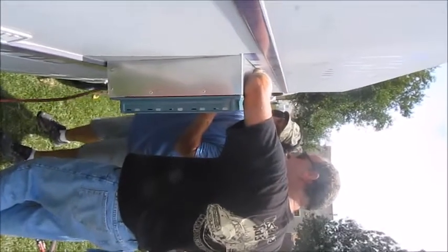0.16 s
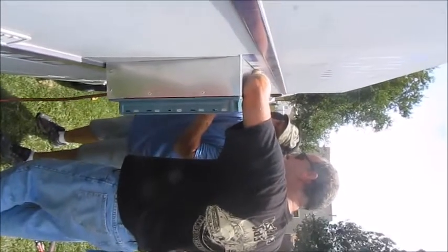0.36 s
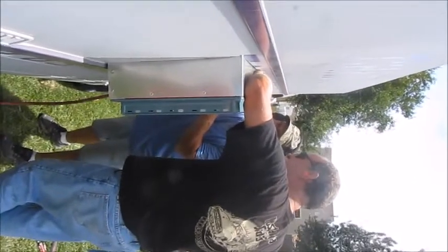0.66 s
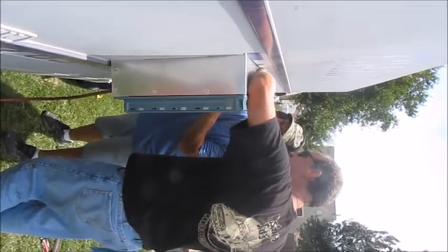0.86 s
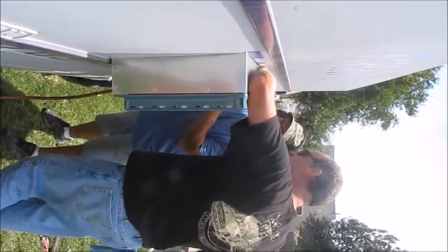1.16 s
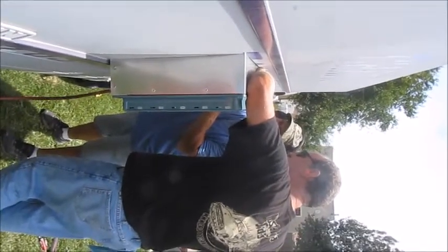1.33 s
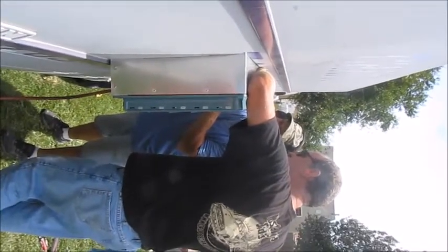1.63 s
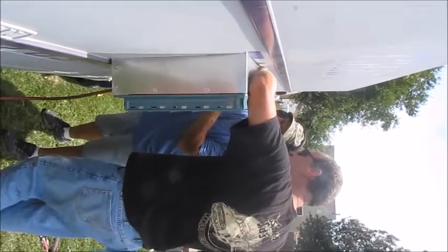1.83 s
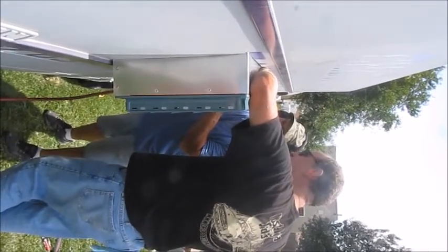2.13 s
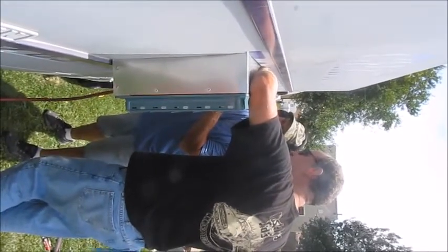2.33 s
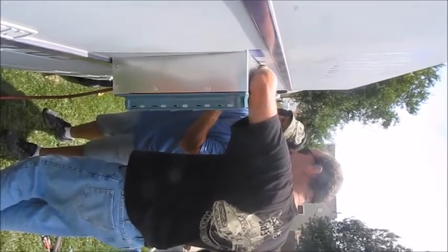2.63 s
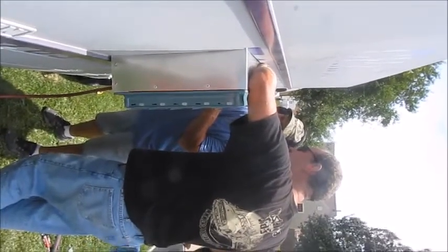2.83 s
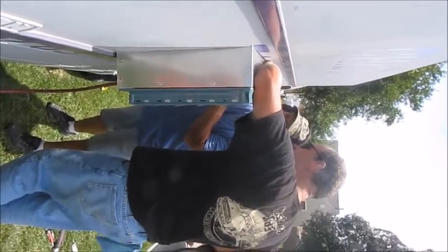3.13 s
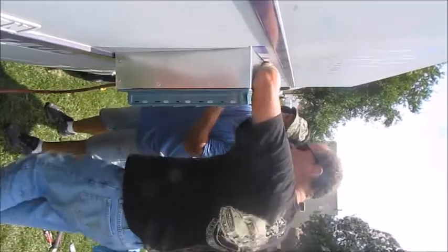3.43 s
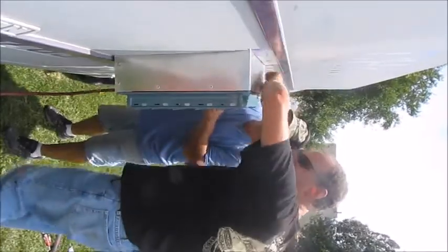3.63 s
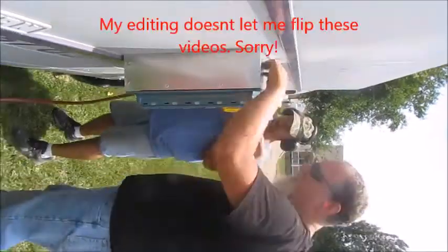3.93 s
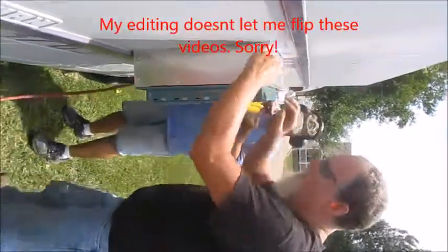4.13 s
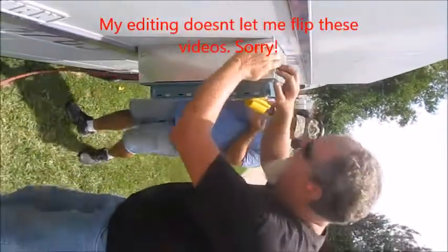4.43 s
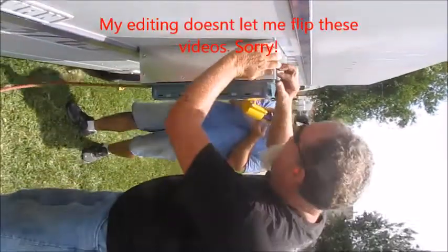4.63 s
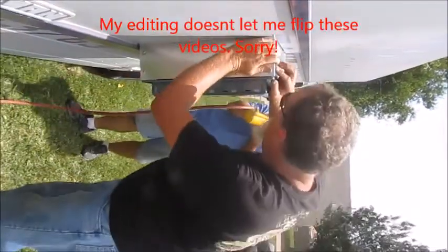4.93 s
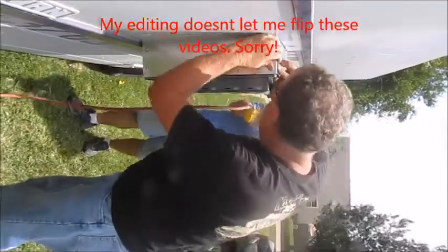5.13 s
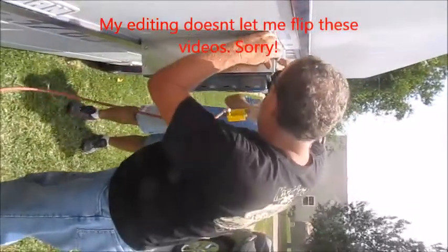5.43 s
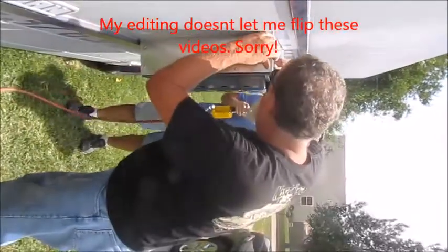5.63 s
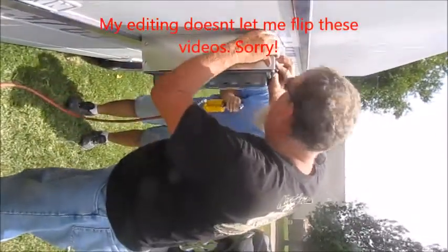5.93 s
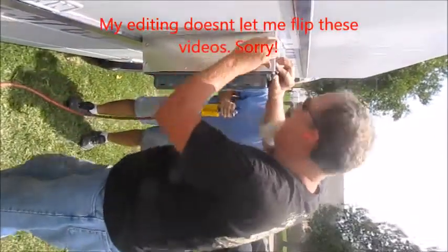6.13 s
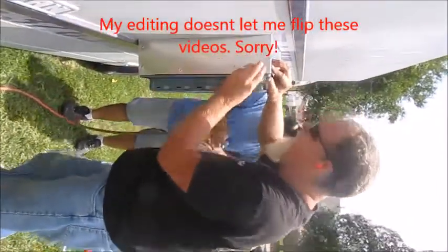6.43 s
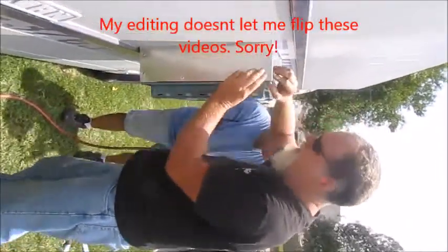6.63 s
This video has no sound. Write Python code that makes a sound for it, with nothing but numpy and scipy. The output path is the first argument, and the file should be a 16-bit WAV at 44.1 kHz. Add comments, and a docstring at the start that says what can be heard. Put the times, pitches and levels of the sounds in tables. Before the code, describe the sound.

An air-powered riveter jolts a metal panel, hisses, then snaps sharply and hisses again, over soft outdoor wash and low drone, ending in handling bumps.

```python
"""Pneumatic rivet gun on a trailer wall

Outdoors, a rivet gun pulls a rivet into sheet metal in two strokes: air rushes in and the panel jolts.
On the second the mandrel snaps. After each, a fading hiss vents the cylinder until the piston clacks home.
Fingers knock and rub the camera case (filtered pushes); a wash, a droning machine and a breeze lie behind.
Automatic gain control turns everything down when the middle range gets loud, then lets it creep back."""
import sys
import numpy as np
from scipy import signal
from scipy.fft import rfft, irfft, next_fast_len
from scipy.io import wavfile

SR = 44100
rng = np.random.default_rng(int(sys.argv[2]) if len(sys.argv) > 2 else 0)


def inscribe(sig):
    """Save sig as 16-bit PCM at rate SR to the path in sys.argv[1].

    A 1-D sig is mono; a 2-D sig holds one channel per row.
    Samples are clipped to [-1, 1] before scaling.
    """
    pcm = np.round(np.clip(np.atleast_2d(sig).T, -1, 1) * 32767)
    wavfile.write(sys.argv[1], SR, pcm.astype(np.int16))


N = 298865
TIME = np.arange(N) / SR  # seconds through the whole scene
AGE = TIME[:SR]  # seconds since one sound began, up to one second


def amp(db):
    """Turns decibels into gain."""
    return 10 ** (np.asarray(db) / 20)


def evened(x):
    """Scales a sound to rms 1."""
    return x / np.sqrt(np.mean(x ** 2) + 1e-20)


def read(points, hz):
    """Reads a table between its points, along a logarithmic frequency axis."""
    f, value = np.transpose(points)
    return np.interp(np.log(hz + 1), np.log(f + 1), value)


def level(points):
    """Draws the gain over time through points of seconds and dB."""
    return amp(np.interp(TIME, *np.transpose(points)))


def add(mix, s, sound):
    """Adds a sound into the mix, starting at s seconds."""
    part = mix[:, round(s * SR):][:, :sound.shape[-1]]
    part += sound[..., :part.shape[1]]


# How alike the gun's direct sound is left and right. Each row: frequency in Hz, likeness (1 is the same).
GUN_LIKENESS = [(100, 1), (3500, .99), (6000, 0.89), (8500, .87), (12000, .45), (16000, .3)]
# The gun's direction. Each row: frequency in Hz, phase in radians by which the left leads.
LEFT_LEAD = [(100, -0.43), (3000, -.05), (6000, -.15), (8500, -.25), (12000, -.6)]
# Difference in how well the two ports hear. Each row: frequency in Hz, left minus right in dB.
PORT_TILT = [(100, -0.9), (700, -0.7), (2400, -0.1), (4400, -0.4), (8500, -0.7), (13000, 2)]


def noise(spectrum, size=SR, likeness=GUN_LIKENESS, lead=1):
    """Colours noise for two microphone ports: a shared part plus a part of opposite sign in each."""
    padded = next_fast_len(size)
    hz = np.fft.rfftfreq(padded, 1 / SR)
    a, b = rfft(rng.standard_normal((2, padded)))
    same = np.clip(read(likeness, hz), -1, 1)
    mid = a * np.sqrt(1 + same)
    side = b * np.sqrt(1 - same)
    left = (mid + side) * np.exp(1j * lead * read(LEFT_LEAD, hz)) * amp(read(PORT_TILT, hz))
    ports = np.array([left, mid - side])
    return evened(irfft(ports * amp(read(spectrum, hz)), padded)[:, :size])


def waver(rate_hz, size=N):
    """Makes smooth random movement of about rms 1, mostly slower than the given rate."""
    knots = np.arange(0, size + 32, 32)  # one point every 32 samples
    hz = np.fft.rfftfreq(len(knots), knots[1] / SR)
    slow = irfft(rfft(rng.standard_normal(len(knots))) / (1 + (hz / rate_hz) ** 4), len(knots))
    return np.interp(np.arange(size), knots, evened(slow))


def ring(modes):
    """Rings struck metal as fading sine waves, scaled to about rms 1 at the start."""
    waves = 0
    for hz, db, t60 in modes:
        tone = np.sin(2 * np.pi * (hz * AGE + rng.random()))
        waves = waves + amp(db - 60 * AGE / t60) * tone
    start_rms = np.sqrt(sum(amp(db) ** 2 for _, db, _ in modes) / 2)
    return waves * np.minimum(AGE / 0.0015, 1) / start_rms


def gate(length, rise, release):
    """Opens over the rise time, holds until the length, then dies away (all in seconds)."""
    return np.minimum(AGE / rise, 1) * np.exp(-np.maximum(AGE - length, 0) / release)


def reflect(x, wet_db=-4, spread=.022, count=24):
    """Adds scattered early echoes from wall, awning and bodies, which comb the sound."""
    delay = .001 + rng.exponential(spread, count)
    taps = np.zeros(SR)
    places = np.minimum(delay * SR, SR - 1).astype(int)
    taps[places] = rng.choice([-1, 1], count) * np.exp(-delay / spread)
    taps *= amp(wet_db) / np.linalg.norm(taps)
    taps[0] = 1  # the direct sound
    return signal.fftconvolve(x, taps[None] / np.linalg.norm(taps), axes=1)[:, :N]


# Colour of the outdoor wash. Each row: frequency in Hz, level in dB per Hz.
WASH_COLOUR = [(120, -51), (200, -20.5), (298, -10.5), (512, -8), (818, -1), (1290, -4.5), (1780, -4.5),
               (2060, -6), (3230, -11), (3870, -19), (5360, -12.5), (7150, -15.5), (9550, -24),
               (11900, -34.5), (15000, -66)]
# How alike the outdoor sound is left and right. Each row: frequency in Hz, likeness (1 is the same).
OUTDOOR_LIKENESS = [(100, 0.91), (3000, 0.96), (6000, 0.79), (8500, 0.73), (12000, 0.2), (16000, 0.18)]
# Resonances of a far fan. Each row: frequency in Hz, width in Hz, level in dB relative to the wash.
FAN = [(880, 73, -15.5), (1800, 58, -18)]


def outdoor_wash():
    """Spreads wide, slightly wavering noise, with a fan's whirr as noise through narrow bands."""
    wash = noise(WASH_COLOUR, size=N, likeness=OUTDOOR_LIKENESS, lead=0) * amp(.4 * waver(10))
    for hz, width, db in FAN:
        band = signal.butter(2, [hz - width / 2, hz + width / 2], "band", fs=SR, output="sos")
        wash = wash + amp(db) * evened(signal.sosfilt(band, rng.standard_normal(N)))
    return wash


# Colour of the machine's drone. Each row: frequency in Hz, level in dB per Hz.
DRONE_COLOUR = [(30, -33.5), (55, -12), (85, -8), (130, 1), (250, -1.5), (350, 0.5), (450, -3.5),
                (600, -8.5), (900, -11.5), (1400, -29), (3000, -43.5), (15000, -100)]
# The machine's hum. Each row: centre pitch in Hz, centre level in dB relative to the bass level.
HUM_TONES = [(55, -23), (167, -22), (302, -12), (861, -23)]


def machine_drone():
    """Makes a lumpy low noise and adds hum tones that waver in pitch and level."""
    drone = noise(DRONE_COLOUR, size=N, likeness=OUTDOOR_LIKENESS, lead=0) * amp(0.88 * waver(14) - 5)
    for hz, db in HUM_TONES:
        turns = np.cumsum(hz * (1 + 0.00696 * waver(6.18))) / SR
        tone = np.sqrt(2) * np.sin(2 * np.pi * turns)
        drone = drone + amp(db + 2 * waver(8)) * tone
    return drone


# Colour of the breeze on the microphone ports. Each row: frequency in Hz, level in dB per Hz.
BREEZE_COLOUR = [(20, -14), (60, 0.5), (110, -4), (200, -15.5), (600, -45), (15000, -110)]


def light_breeze():
    """Blows uneven low noise on the ports, pushing them partly in opposite directions."""
    opposed = [(20, -0.33), (200, -.3)]
    return noise(BREEZE_COLOUR, size=N, likeness=opposed, lead=0) * amp(2.4 * waver(9))


WASH_DB, BREEZE_DB = -41.9, -22  # dB; the breeze is relative to the bass level
# Shared level of drone and breeze. Each row: time in seconds, level in dB.
BASS_LEVEL = [(0, -48.5), (.6, -41), (1.6, -32.5), (2.3, -32), (2.57, -53), (3.07, -53), (3.12, -69),
              (3.9, -69), (4.15, -53), (4.6, -42), (4.75, -56), (6.78, -59)]


def outdoors():
    """Layers the steady wash with the machine's drone and the breeze, whose level moves over time."""
    bass = machine_drone() + amp(BREEZE_DB) * light_breeze()
    return amp(WASH_DB) * outdoor_wash() + level(BASS_LEVEL) * bass


# Trigger pulls. Each row: start in seconds, length in seconds, air level in dB, swell of the air over
# the pull in dB, panel jolt in dB, starting metal scrape in dB, judder in dB relative to the jolt.
TRIGGER_PULLS = [(0.973, .079, -32.5, 4, -27.5, -44, 0), (2.773, 0.052, -30.5, -0.5, -33.5, -29, -3)]
# Cylinder venting. Each row: start in seconds, seconds until the piston is home, blast in dB, sizzle in dB,
# outflow halfway through in dB, rise in seconds, nose rattling on the panel in dB (both starting levels
# for blast and sizzle).
CYLINDER_VENTS = [(1.669, .565, -8.7, -12, -37.5, 0.0045, -16.5),
                  (4.051, 0.559, -5.5, -15.5, -31.5, 0.01, -42)]
# The mandrel breaking, one row: start in seconds, clatter and crack level in dB, clatter's time to fall
# 60 dB in seconds, panel ring in dB.
MANDREL_SNAP = (2.8318, -1, 0.1434, -14.5)
# The piston hitting its stop. Each row: start in seconds, level in dB, time to fall 60 dB in seconds.
PISTON_STOPS = [(2.232, -29, 0.074), (4.6245, -24.5, 0.072)]
# Light scuffs of the tool. Each row: start in seconds, length in seconds, level in dB.
TOOL_SCUFFS = [(3.525, 0.015, -38), (6.454, 0.046, -42)]


def gun():
    """Places the gun's air and metal sounds, each group with its own scattered echoes."""
    air, metal = np.zeros((2, 2, N))
    for s, *row in TRIGGER_PULLS:
        add(metal, s, pull(*row))
    for s, *row in CYLINDER_VENTS:
        add(air, s, vent(*row))
    add(metal, 1.93, regrip())
    for s, *row in PISTON_STOPS:
        add(metal, s, piston_stop(*row))
    add(metal, MANDREL_SNAP[0], snap(*MANDREL_SNAP[1:]))
    for s, *row in TOOL_SCUFFS:
        add(metal, s, scuff(*row))
    air_echoes = reflect(air, wet_db=-6, spread=.024, count=60)
    metal_echoes = reflect(metal, wet_db=-6, spread=.014, count=60)
    return air_echoes + metal_echoes


# Colour of the air rushing in. Each row: frequency in Hz, level in dB per Hz.
INTAKE_COLOUR = [(710, -36), (1200, -1), (1750, -15), (2260, -2.5), (2430, -10), (2860, -1), (4240, -21.5),
                 (4670, -6.5), (9080, -6), (15000, -32), (15500, -80)]
# Colour of metal rattling and scraping. Each row: frequency in Hz, level in dB per Hz.
RATTLE_COLOUR = [(40, -35), (130, -7.5), (260, -1), (370, -3.5), (480, 3.5), (680, -3), (1200, -1.5),
                 (1650, -13), (2900, -5), (3900, -20), (6000, -17), (15000, -47.5)]
# Colour of the panel's low judder. Each row: frequency in Hz, level in dB per Hz.
JUDDER_COLOUR = [(40, -32), (90, -14), (170, 2), (350, -2), (520, -11), (900, -24), (3000, -50),
                 (15000, -90)]
# The panel's low flexing tones. Each row: pitch in Hz, level in dB, time to fall 60 dB in seconds.
PANEL_FLEX = [(109, -11.5, 0.23), (159, -2, 0.458), (194.6, 1.5, .45), (260, -9, .14), (340, -8.5, 0.11)]


def pull(length, air_db, swell_db, jolt_db, scrape_db, judder_db):
    """Fills the cylinder with rushing air while the rivet drags on the panel and makes it flex."""
    stroke = gate(length, 0.0022, 0.018)
    air_gain = amp(air_db + swell_db * np.minimum(AGE / length, 1))
    air = air_gain * noise(INTAKE_COLOUR) * amp(1.7 * waver(70, size=SR))
    scrape = amp(scrape_db - 72 * AGE) * noise(RATTLE_COLOUR)
    judder = amp(judder_db) * noise(JUDDER_COLOUR) * gate(length / 2, 0.0055, 0.039)
    return stroke * (air + scrape) + amp(jolt_db) * (ring(PANEL_FLEX) + judder)


# Colour of the venting blast. Each row: frequency in Hz, level in dB per Hz.
BLAST_COLOUR = [(250, -60.5), (420, -28), (742, -24.5), (971, -17), (1540, -14), (1770, -8.5), (2280, -6.5),
                (3310, -4.5), (3960, -15.5), (6020, -2), (7650, -1.5), (8250, -0.5), (10800, -13.5),
                (12900, -16), (15000, -26.5)]
# Colour of its sharp treble sizzle. Each row: frequency in Hz, level in dB per Hz.
SIZZLE_COLOUR = [(4000, -38), (4800, 1.5), (6000, -4), (8000, -8), (9700, 2), (12000, -13), (15500, -36.5)]
# Colour of the air the piston pushes out. Each row: frequency in Hz, level in dB per Hz.
OUTFLOW_COLOUR = [(530, -46.5), (900, -13.5), (1390, -14), (1490, -19.5), (1890, -3), (2280, -1.5),
                  (3060, -2), (3290, 0.5), (3830, -11.5), (4260, -5.5), (7670, -1.5), (12300, -15),
                  (15000, -34)]
VENT_FALL_DB_PER_S = 104


def vent(length, blast_db, sizzle_db, outflow_db, rise, rattle_db, rattle_fall=119):
    """Lets pressure fall exponentially, over a slower-fading stream pushed out by the returning piston."""
    pressure = amp(-VENT_FALL_DB_PER_S * AGE)
    blast = amp(blast_db) * pressure * noise(BLAST_COLOUR, lead=.8)
    sizzle = amp(sizzle_db) * pressure * noise(SIZZLE_COLOUR, lead=1.5)
    outflow = amp(outflow_db - 18 * (AGE - length / 2)) * noise(OUTFLOW_COLOUR)
    hiss = (blast + sizzle + outflow) * amp(0.58 * waver(148.3, size=SR))
    rattle = amp(rattle_db - rattle_fall * AGE + 2 * waver(90, size=SR)) * noise(RATTLE_COLOUR)
    return (hiss + rattle) * gate(length, rise, 0.013)


# Colour of the jaws sliding. Each row: frequency in Hz, level in dB per Hz.
SLIDE_COLOUR = [(100, -30), (400, -6), (600, -2), (880, 1), (1400, -16), (2200, -11), (3200, -7.5),
                (4100, -27), (15000, -60)]


def regrip():
    """Slides the jaws down the mandrel for a new grip between the strokes, as a short soft noise."""
    return amp(-35) * noise(SLIDE_COLOUR) * gate(.15, 0.044, 0.057)


# Fingers rubbing on the case. Each row: start in seconds, length in seconds, level in dB, pitch in Hz.
FINGER_RUBS = [(2.08, .14, -28, 115), (2.2, .33, -38, 125), (5.05, 1.55, -38.5, 240),
               (6.581, 0.11, -18.5, 600), (6.672, 0.09, -17.5, 450)]
# Finger knocks on the camera case. Each row: start in seconds, peak level in dB, pitch in Hz.
FINGER_KNOCKS = [(2.135, -15, 130), (4.658, -10, 170), (4.667, -8, 125), (4.686, -14, 700),
                 (4.696, -11, 520), (4.832, -17, 330), (5.399, -17, 280), (5.4185, -11, 540),
                 (5.73, -18, 400), (6.1285, -16, 520), (6.352, -19, 270), (6.539, -17, 380),
                 (6.585, -11, 450), (6.621, -1, 500), (6.6507, -2, 1100), (6.6615, 1, 700), (6.668, 0, 660),
                 (6.756, -1, 550)]
DRAG_S, DRAG_DB, DRAG_HZ = .08, -20, 230  # skin drag centred on every knock; dB relative to the knock


def fingers():
    """Places longer rubs and single knocks, each knock with a short drag of the skin."""
    out = np.zeros((2, N))
    for s, *row in FINGER_RUBS:
        add(out, s, rub(*row))
    for s, db, hz in FINGER_KNOCKS:
        knock = case(signal.unit_impulse(SR // 10), hz, width=1.4)
        add(out, s, amp(db) * knock / abs(knock).max())
        add(out, s - DRAG_S / 2, rub(DRAG_S, db + DRAG_DB, DRAG_HZ))
    return out


def rub(length, db, hz, grain_db=3.5, slips_per_s=1100, grip_db=4, grip_hz=12):
    """Makes many small random slips of skin on the case, under an uneven grip."""
    t = TIME[TIME < length]
    sign = rng.choice([-1, 1], len(t))
    slipping = rng.random(len(t)) < slips_per_s / SR
    size = np.minimum(rng.exponential(1, len(t)), 3)
    grip = waver(grip_hz)[:len(t)]
    slips = sign * slipping * amp(grain_db * size + grip_db * grip)
    return amp(db) * evened(case(slips, hz, width=2.1)) * np.sqrt(np.sin(np.pi * t / length))


CENTRE_HZ, LEAN_DB_PER_OCTAVE = 185, 5  # dull pushes reach the right port more, sharp ones the left


def case(push, hz, width, top=4, count=5):
    """Lets the case give under a push; the far port moves the opposite way, count samples later."""
    band = [hz / max(width, 1.1), hz * max(width, 1.1)]
    body = signal.sosfilt(signal.butter(2, band, "band", fs=SR, output="sos"), push)
    body = signal.lfilter(*signal.butter(2, [hz / 5, min(top * hz, SR / 3)], "band", fs=SR), body)
    lean_db = LEAN_DB_PER_OCTAVE * np.log2(hz / CENTRE_HZ)
    return np.array([body, -np.roll(body, count)]) * amp([[lean_db / 2], [-lean_db / 2]])


# Colour of the piston's clack. Each row: frequency in Hz, level in dB per Hz.
STOP_COLOUR = [(100, -26.5), (600, -22), (850, -10), (1400, -20), (2250, 0), (3400, -1), (4100, -17),
               (5200, -12), (8500, -13), (11000, -25), (15500, -40)]


def piston_stop(db, t60):
    """Clacks the piston against its stop, as a sudden noise that fades fast."""
    return amp(db - 60 * AGE / t60) * noise(STOP_COLOUR) * np.minimum(AGE / 0.00092, 1)


# Colour of the breaking steel. Each row: frequency in Hz, level in dB per Hz.
CRACK_COLOUR = [(100, -17), (200, -9), (350, -10), (700, -6), (1200, 0), (1650, -7), (2150, -1), (3200, -1),
                (3900, -11), (4900, -5), (7000, -10), (9300, -6.5), (12300, -22), (15500, -29)]
# Lasting tones of the wall panel. Each row: pitch in Hz, level in dB, time to fall 60 dB in seconds.
PANEL_TONES = [(190, -5, 0.41), (1292, -9, .4), (1380, -8, .35), (2105, 1, 0.28), (2100, -1.5, 0.26),
               (2310, -13, .45), (2740, -13, .4), (2890, -10, .3), (3070, -10, .26), (4651, -11, .21),
               (5582, -12, .25)]


def snap(db, t60, ring_db, crack_db=6, crack_s=0.0021, tail_db=-19.5, judder_db=-40, judder_s=.2):
    """Breaks the mandrel: a brief crack, a dense clatter of steel, the panel's ring and its low judder."""
    clatter = amp(-60 * AGE / t60 - 1.5)
    crack = amp(crack_db) * np.exp(-(AGE / crack_s) ** 2)
    tail = amp(tail_db - 60 * AGE / 0.32)
    fade = (clatter + crack + tail) * np.minimum(AGE / 0.00044, 1)
    judder = amp(judder_db) * noise(JUDDER_COLOUR) * gate(judder_s, .005, .03)
    return amp(db) * noise(CRACK_COLOUR, lead=1.5) * fade + amp(ring_db) * ring(PANEL_TONES) + judder


def scuff(length, db):
    """Brushes the tool lightly, as a short noise with the colour of the intake."""
    return amp(db) * noise(INTAKE_COLOUR) * gate(length, length / 2, .005)


def scene():
    """Adds up the yard, the gun and the hand on the camera."""
    return outdoors() + gun() + fingers()


LIMIT_DB, RECOVER_DB_PER_S = -25, 3.8
SENSE_HZ, SENSE_S = (250, 1200), .01  # the band the gain control senses, and its smoothing in seconds


def gain_control(x, ahead_s=.003):
    """Turns down when the middle range passes the limit, looking slightly ahead, then recovers slowly."""
    sensed = signal.lfilter(*signal.butter(1, SENSE_HZ, "band", fs=SR), x)
    keep = np.exp(-1 / (SENSE_S * SR))
    smoothed = signal.lfilter([1 - keep], [1, -keep], (sensed ** 2).mean(0))
    power = np.interp(TIME + ahead_s, TIME, smoothed)
    over_db = np.maximum(10 * np.log10(power + 1e-12) - LIMIT_DB, 0)
    recovery = RECOVER_DB_PER_S * TIME
    # the running maximum holds the deepest cut, which the recovery slope then eases
    return x * amp(recovery - np.maximum.accumulate(over_db + recovery))


EDGE_HZ = 15600  # top of the sound


def record(dry, ceiling=0.96):
    """Applies gain control, soft overload on the peaks, then the treble limit."""
    limited = ceiling * np.tanh(gain_control(dry) / ceiling)
    lowpass = signal.firwin(511, EDGE_HZ, window=("kaiser", 9), fs=SR)
    return signal.oaconvolve(limited, lowpass[None], "same")


dry = scene()
out = record(dry)
inscribe(out)
```